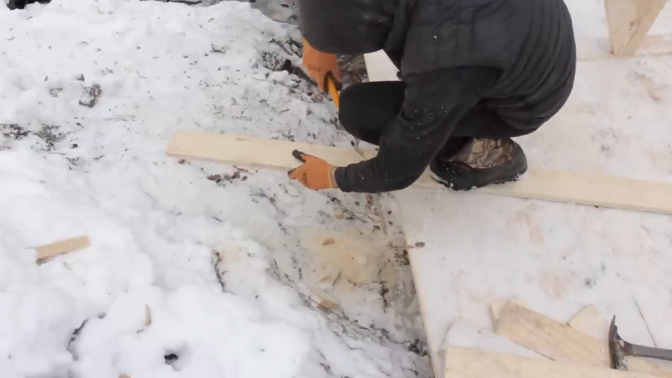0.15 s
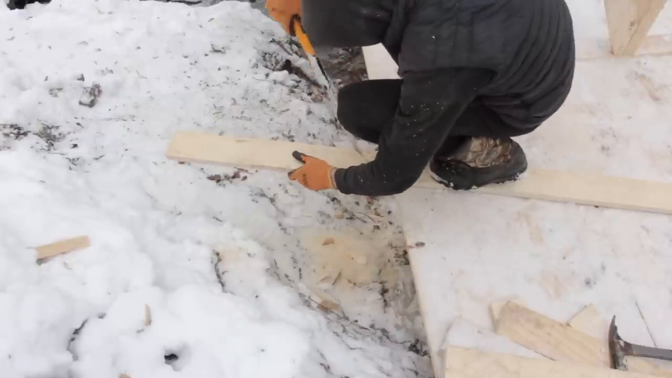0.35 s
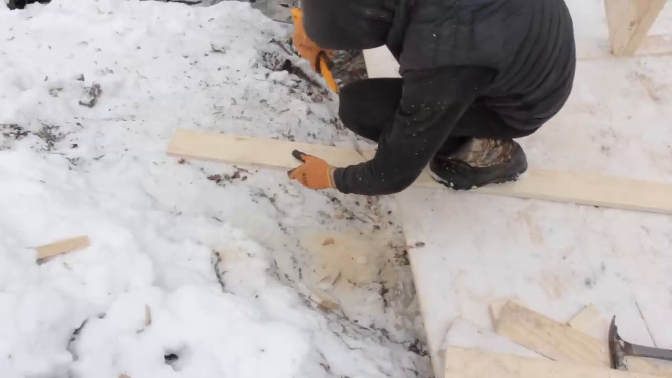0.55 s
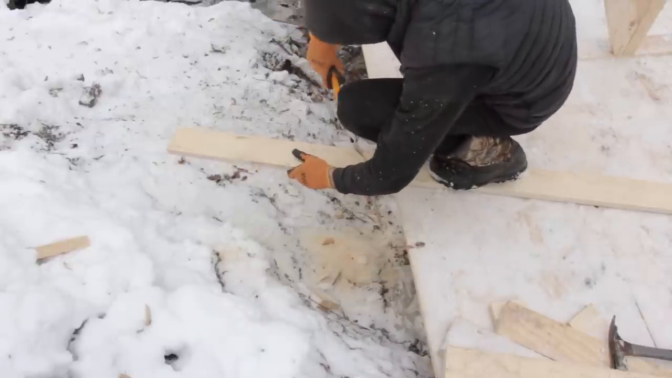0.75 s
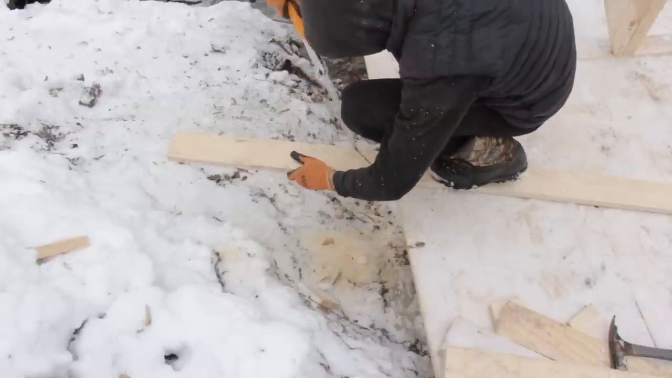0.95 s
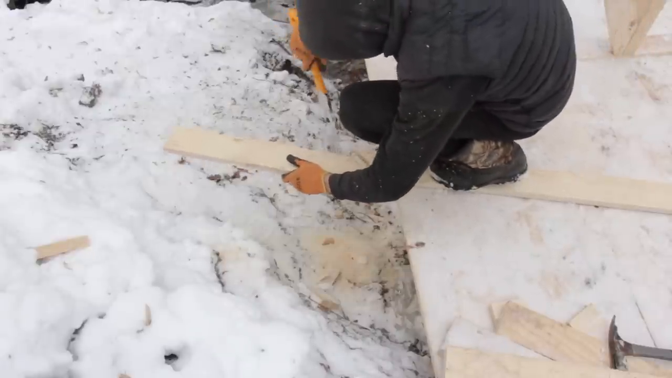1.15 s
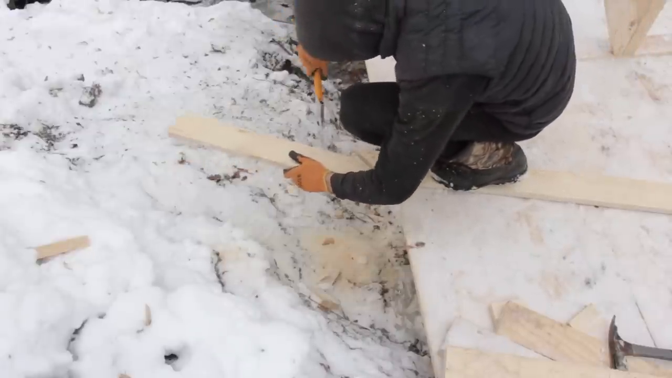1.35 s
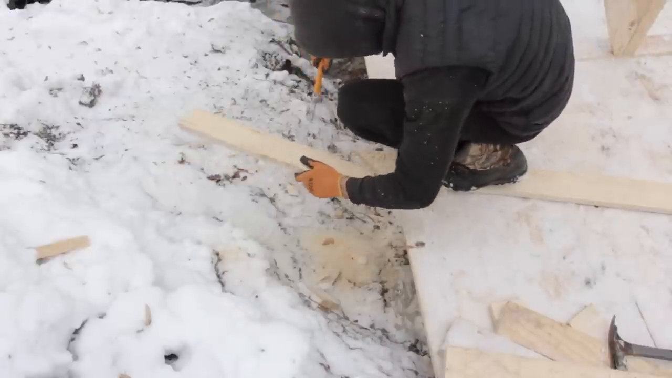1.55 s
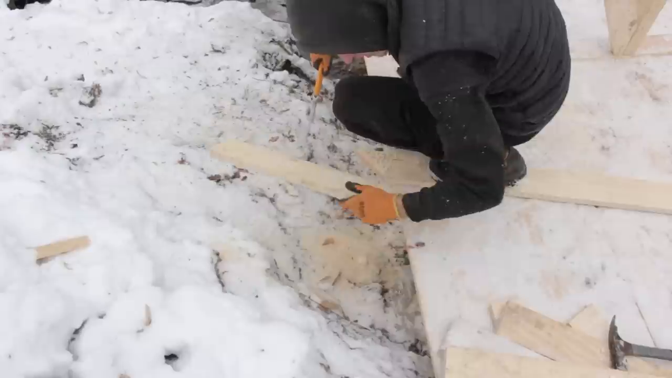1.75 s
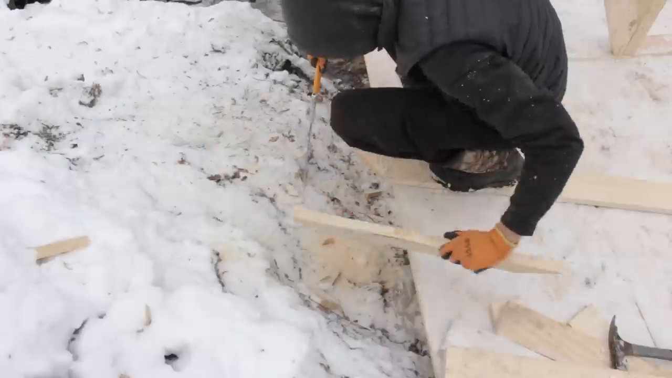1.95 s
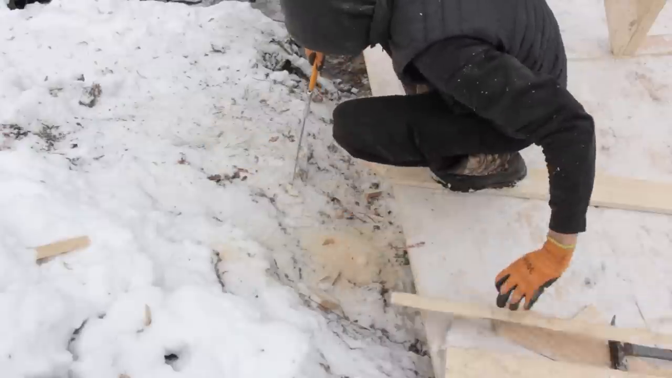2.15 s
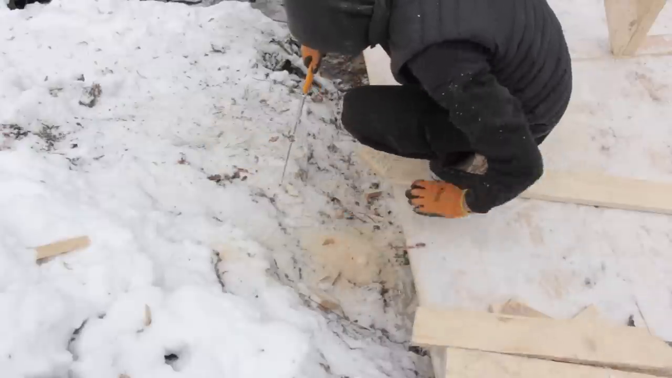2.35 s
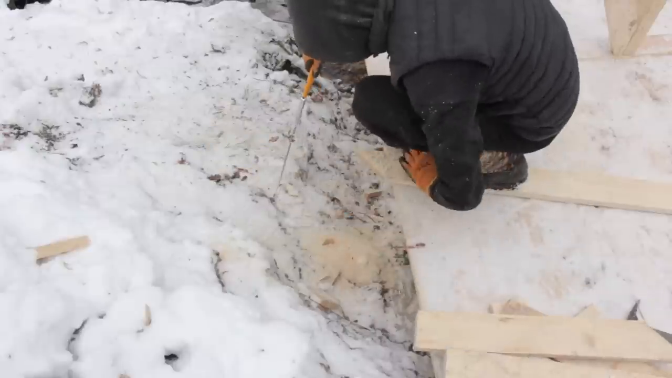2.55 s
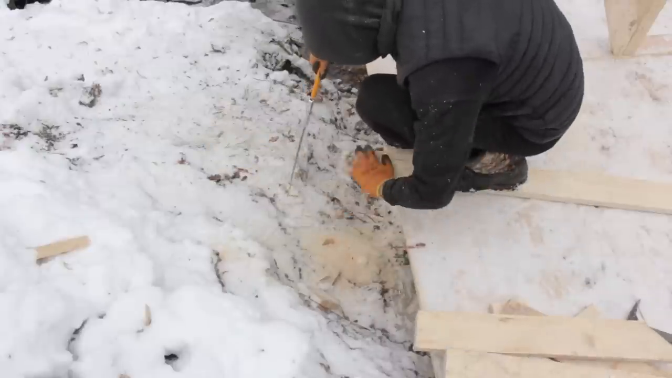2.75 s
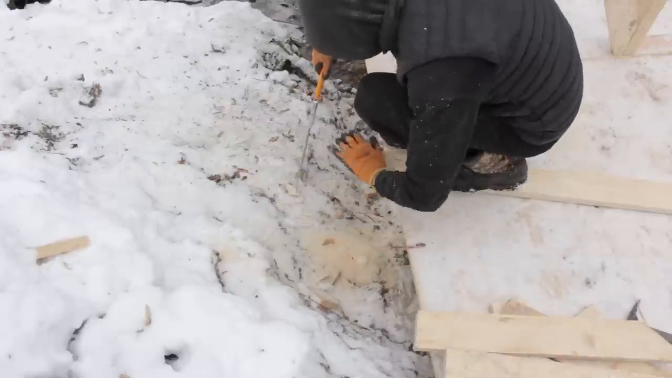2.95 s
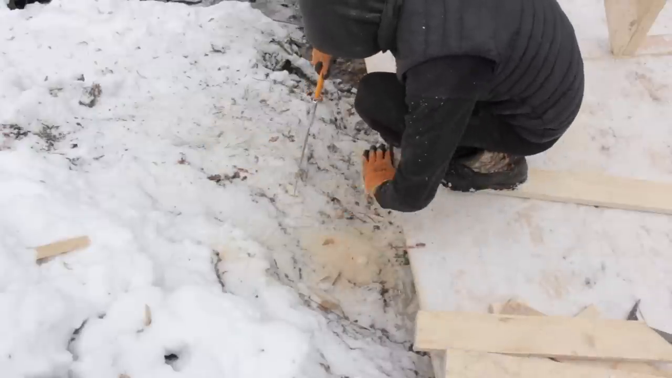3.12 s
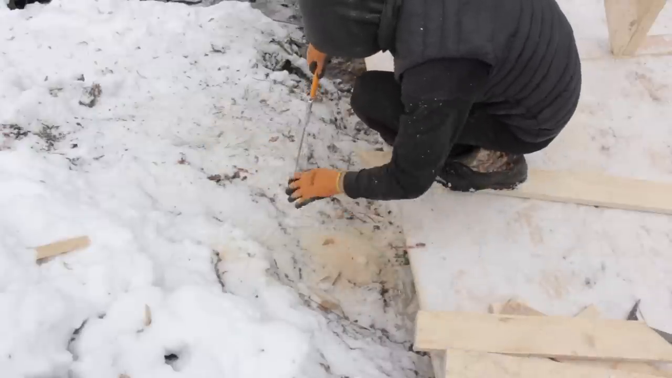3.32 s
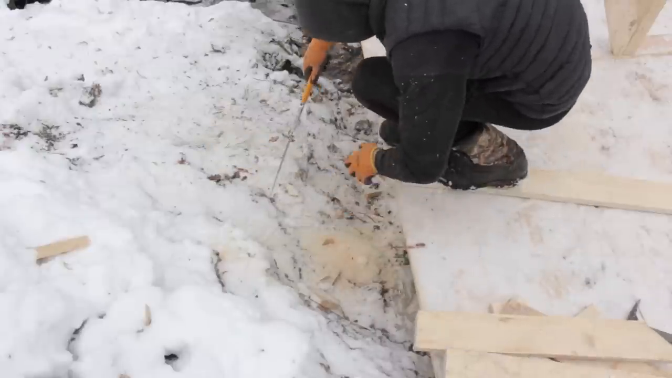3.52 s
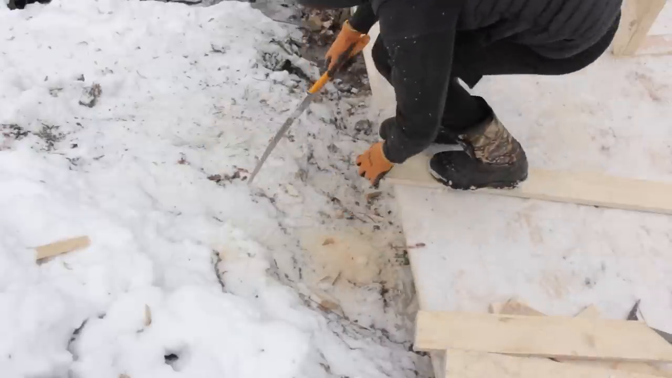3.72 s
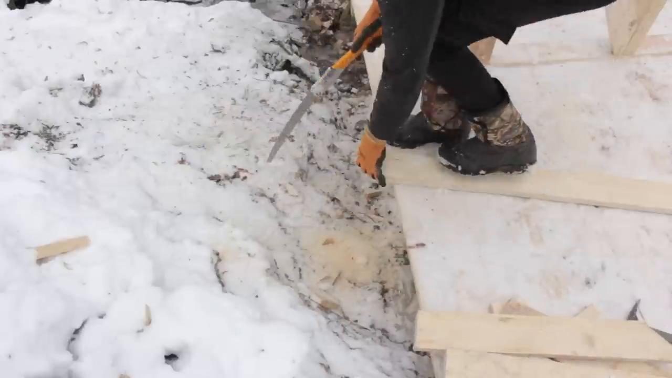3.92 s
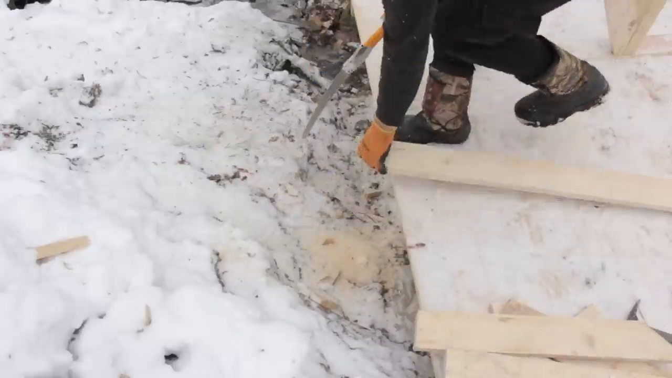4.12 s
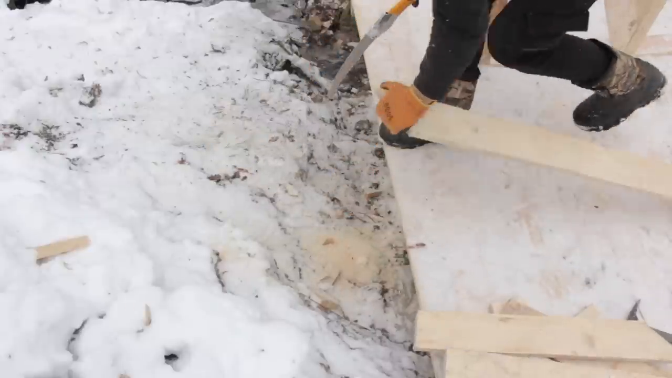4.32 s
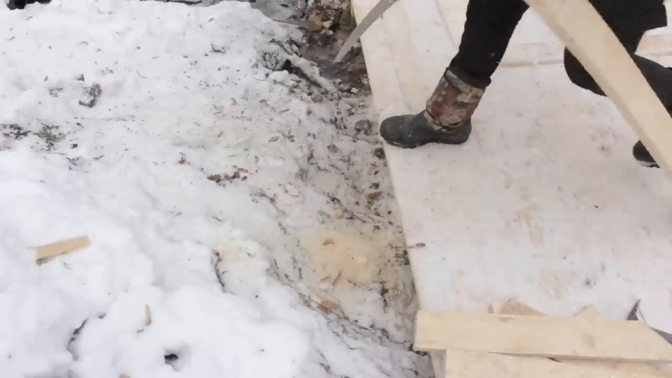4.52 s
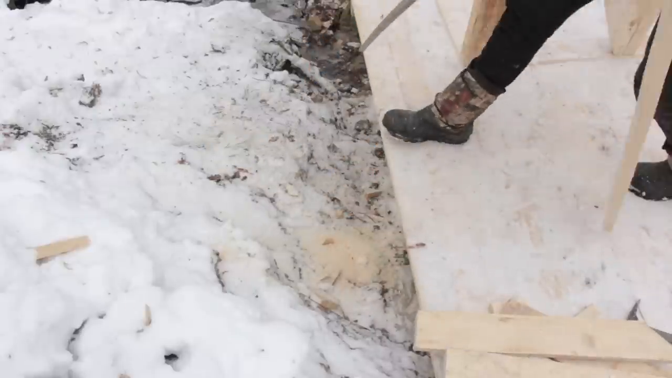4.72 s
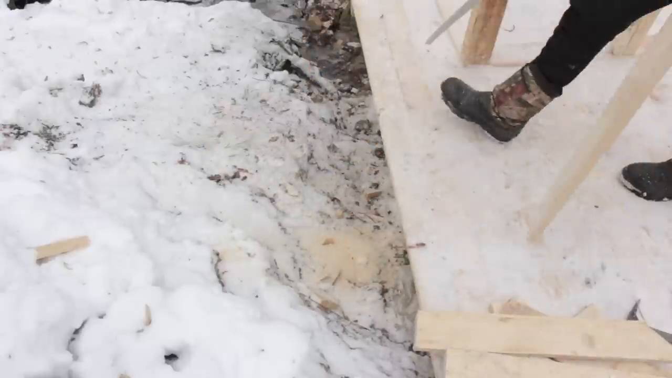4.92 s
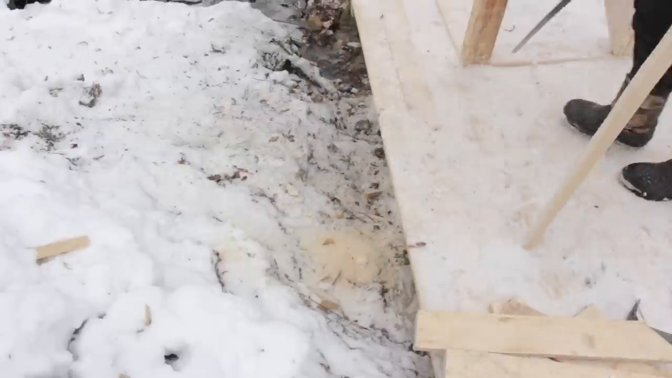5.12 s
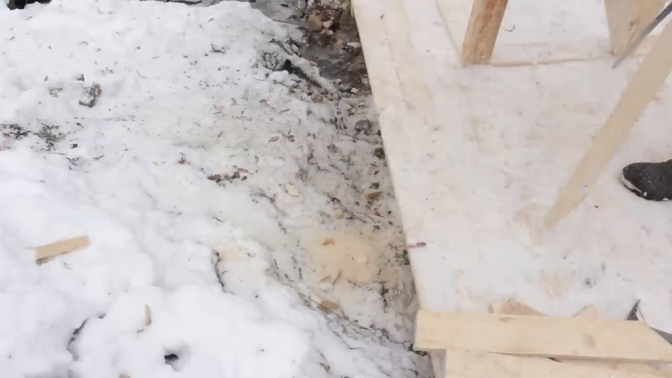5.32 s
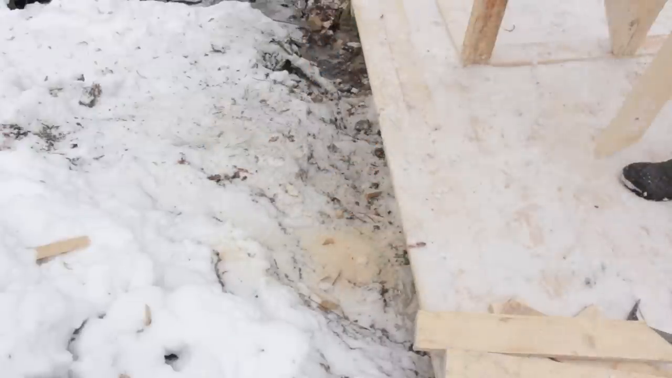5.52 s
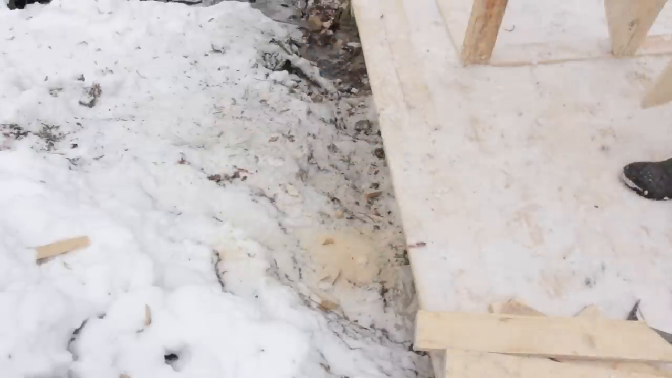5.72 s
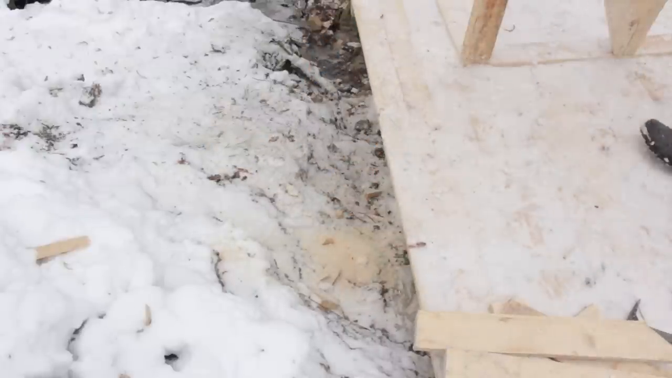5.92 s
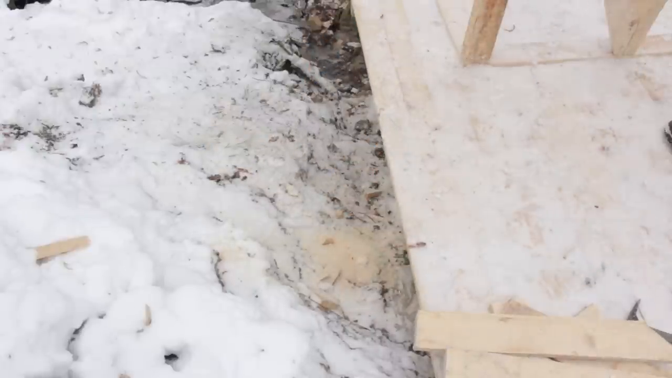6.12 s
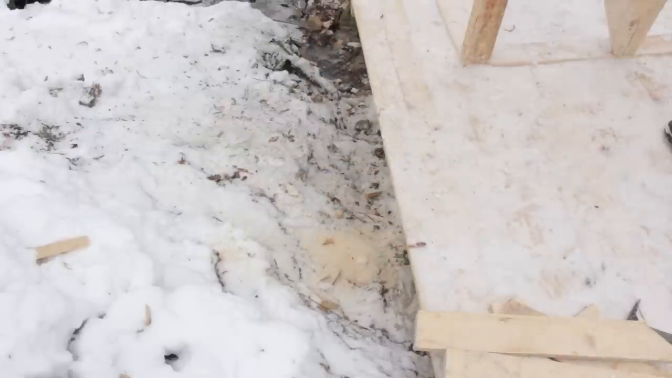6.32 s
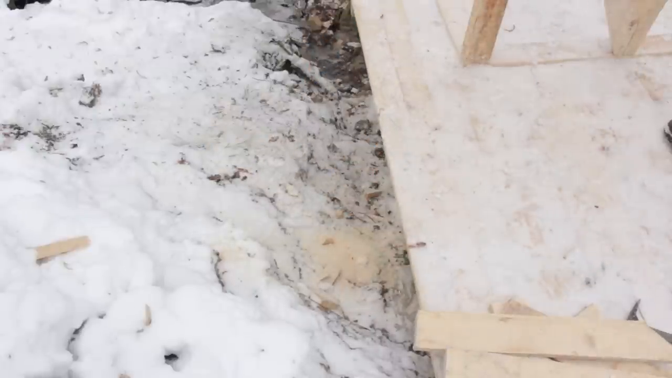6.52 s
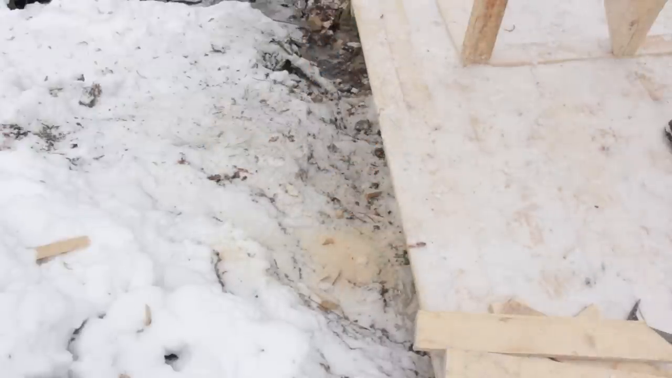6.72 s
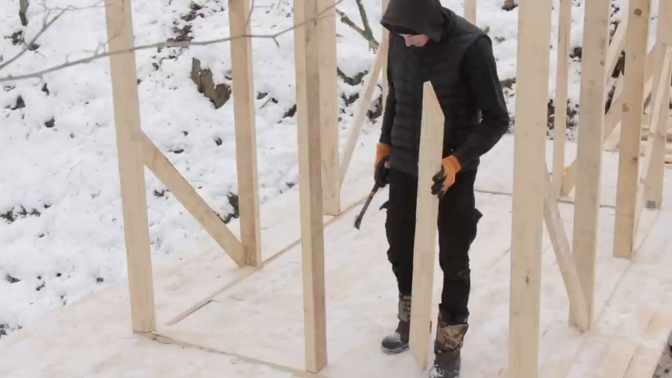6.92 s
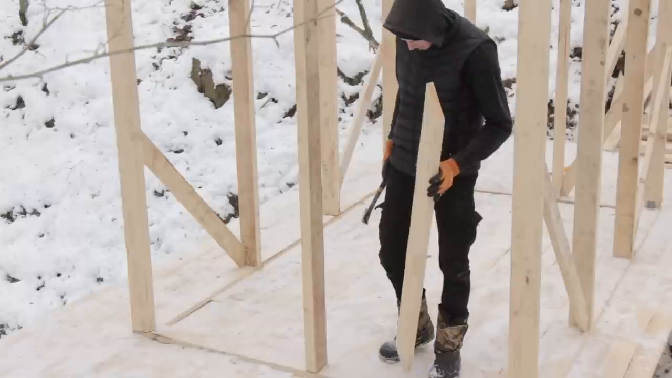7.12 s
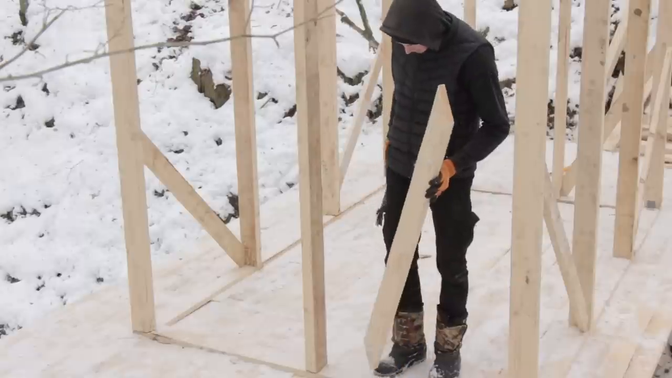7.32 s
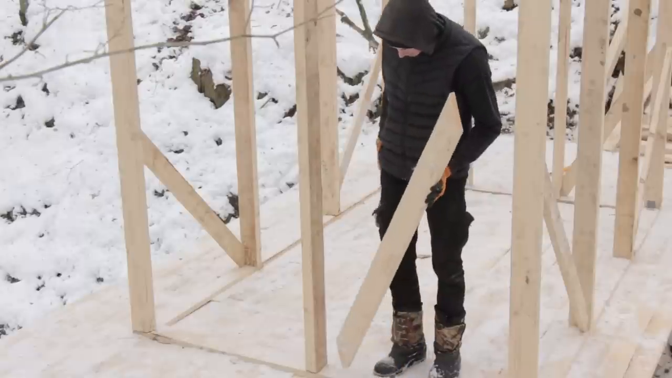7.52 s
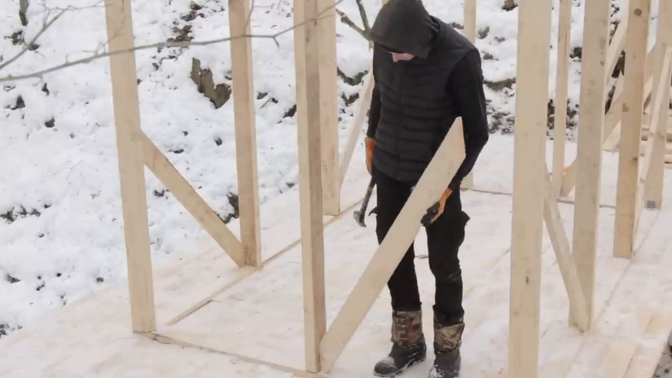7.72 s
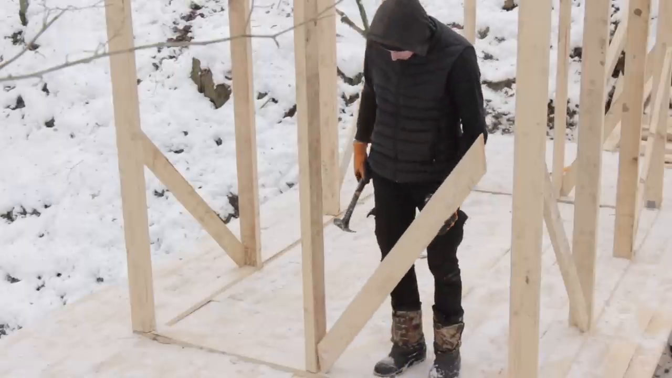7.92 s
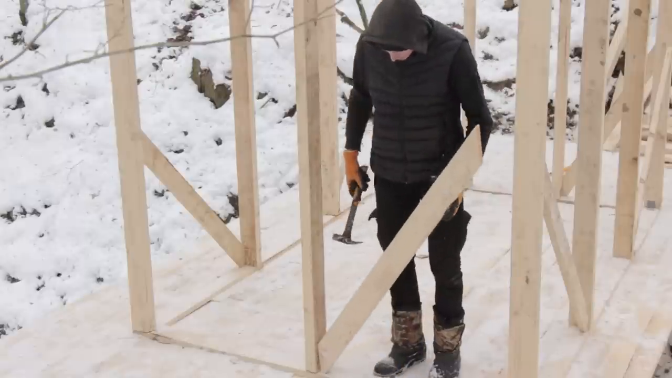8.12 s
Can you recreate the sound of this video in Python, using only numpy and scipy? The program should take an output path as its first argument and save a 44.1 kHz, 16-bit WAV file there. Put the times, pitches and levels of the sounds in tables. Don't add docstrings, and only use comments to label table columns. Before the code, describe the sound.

Last rasping handsaw strokes through a plank, offcut clattering onto wood, then boot thuds on a plywood deck beside a softly running stream.

```python
import sys
import numpy as np
from scipy import signal
from scipy.fft import rfft, irfft, next_fast_len
from scipy.io import wavfile
from scipy.ndimage import uniform_filter1d

SR = 44100
rng = np.random.default_rng(int(sys.argv[2]) if len(sys.argv) > 2 else 0)


def materialize(psi):
    bounded = np.clip(np.atleast_2d(psi).T, -1, 1)
    quanta = np.round(bounded * 32767).astype(np.int16)
    wavfile.write(sys.argv[1], SR, quanta)


def boost(x):
    u = np.asarray(x, float) / 20
    return 10 ** u


N = 364251
CHANGE_S = 6.893


def level(x, db=0):
    return x * boost(db) / np.sqrt(np.mean(x ** 2))


def colour(x, points):
    hz, db = np.transpose(points)
    size = next_fast_len(len(x))
    f = np.maximum(np.arange(size // 2 + 1) * SR / size, 1)
    gain = boost(np.interp(np.log(f), np.log(hz), db))
    return level(irfft(rfft(x, size) * gain, size)[:len(x)])


def ring(x, hz, width_hz):
    return signal.lfilter(*signal.iirpeak(hz, hz / width_hz, fs=SR), x)


def body(x, peaks):
    parts = [(-1) ** k * boost(db) * ring(x, hz, width) for k, (hz, width, db) in enumerate(peaks)]
    return level(sum(parts))


def walk(rate):
    k = int(SR / rate)
    steps = np.repeat(rng.standard_normal(N // k + 1), k)
    return 2.46 * uniform_filter1d(uniform_filter1d(steps, k), k)[:N]


def grit(per_s, spread_db):
    happens, sign, size = rng.random((N, 3)).T
    clicks = (happens < per_s / SR) * np.sign(sign - .5)
    return level(clicks * boost(-spread_db * np.log(1 - .97 * size)))


def split(x, hz):
    filters = [signal.butter(4, hz, kind, fs=SR, output="sos") for kind in ("low", "high")]
    return [level(signal.sosfilt(sos, x)) for sos in filters]


def swells(rows, power=1.4):
    t, out = np.arange(N) / SR, np.zeros((len(rows), N))
    for gain, (s, db, rise, fall, *_) in zip(out, rows):
        near = slice(max(int((s - 3 * rise) * SR), 0), max(int((s + 3 * fall) * SR), 0))
        away = np.where(t[near] < s, (s - t[near]) / rise, (t[near] - s) / fall)
        gain[near] = boost(db - 20 * away ** power)
    return out


def fade(t, t60):
    return np.exp(-np.log(1000) * t / max(t60, .01))


def add(out, s, sound):
    i = int(s * SR)
    if s < CHANGE_S:
        sound = sound[:int(CHANGE_S * SR) - i]
    out[i:i + len(sound)] += sound


def blow(db):
    return boost(db + 1.17 * max(db + 9, 0))


# deepest bite in seconds, bite in dB, rise in s, fall in s, plank note over bite in dB.
STROKES = [
    (-0.02, -43, 0.12, 0.094, -19),
    (0.09, -44, 0.065, 0.053, -4),
    (0.147, -29.5, 0.079, 0.071, 6.5),
    (0.392, -25, 0.1, 0.067, 0.5),
    (0.56, -47, 0.06, 0.063, -6),
    (0.632, -37, 0.13, 0.11, 1),
    (0.94, -25, 0.1, 0.084, -4.5),
    (1.11, -62, 0.082, 0.14, -15),
]
# start in seconds, extra bite in dB, singing blade note in Hz, its dB.
CATCHES = [(0.06, 6, 4160, -36), (0.124, 2, 5660, -41), (0.149, 0, 4160, -40), (0.33, -1, 5800, -33),
           (0.344, 0, 4070, -30), (0.357, -2, 7200, -37), (0.369, -1, 10000, -25), (0.381, 3, 10600, -33),
           (0.4, 3, 11700, -33), (0.412, 1, 1040, -24), (0.422, 1.5, 4150, -23), (0.428, 4, 10400, -30),
           (0.432, 3, 11800, -37), (0.617, 3, 4200, -28), (0.641, 1, 4500, -30), (0.668, 4, 4300, -28),
           (0.853, 1, 4260, -29), (0.874, 5, 4370, -26), (0.893, 6, 4170, -21), (0.904, 4.5, 1710, -22),
           (0.919, 4, 10300, -25), (0.935, 4, 4200, -17), (0.948, -8, 4300, -30), (0.955, 10.5, 10200, -27),
           (0.979, 10.5, 11800, -31), (1.005, 12.5, 4200, -27), (1.084, 7, 10300, -40),
           (1.095, 6, 10500, -41)]
# frequency in Hz, level in dB per Hz.
TEETH = [(120, -33), (200, 13.5), (305, -10), (499, -5.5), (1200, -14), (2280, -8), (3050, -15), (4170, -9),
         (4900, -33.5), (8300, -36), (11000, -32), (15800, -46)]
# frequency in Hz, width in Hz, level in dB.
BLADE = [(520, 430, 1), (840, 33, 8.5), (1033, 48, 12), (1660, 250, 8.5), (2330, 190, -5), (3295, 91, 5.5),
         (3350, 92, -45.5), (4220, 110, -6), (5280, 41, -18), (5800, 150, -9), (6350, 97, -47),
         (9320, 260, -21), (11400, 100, -31), (11800, 110, -20)]
# frequency in Hz, width in Hz, level in dB.
KERF = [(1035, 51, 4.5), (1077, 95, -3.5)]
# frequency in Hz, width in Hz, level in dB.
HUM = [(79.4, 17, 1.5), (100.4, 21.4, 0.5), (143, 7.5, -7), (240.3, 14, -8)]


def saw():
    t = np.arange(N) / SR
    strokes = swells(STROKES)
    bite = strokes.sum(0)
    note = boost(np.array(STROKES)[:, -1]) @ strokes
    surge_db = sum(db * np.exp(-((t - s) / np.where(t < s, 0.0017, 0.01)) ** 2) for s, db, *_ in CATCHES)
    tearing = grit(5000, 3.8) * boost(surge_db + 1.0 * walk(129.3))

    lag_s = 0.043
    keep = np.exp(-1 / (lag_s * SR))
    lagged = signal.lfilter([1 - keep], [1, -keep], bite, zi=[bite[0]])[0]
    shake = boost(-28.5) * lagged ** 0.18 * np.minimum(lagged / boost(-42.5), 1)

    voice = level(colour(tearing, TEETH), -2.3) + level(body(tearing, BLADE), -0.88)
    low, high = split(voice, 5900)
    _, low = split(low - ring(low, 1020, 250), 315)
    rasp = boost(-7) * bite.max() * (bite / bite.max()) ** 0.94
    return bite * low + rasp * high + note * body(tearing, KERF) + shake * body(tearing, HUM)


def sing():
    half_s, sing_s = 0.005, 0.014
    out, t = np.zeros(N + SR), np.arange(SR // 10) / SR
    for s, _, hz, db in CATCHES:
        scratch = rng.standard_normal(len(t)) * np.exp(-(t / half_s - 1) ** 2)
        tone = ring(scratch, hz, 3.2 / sing_s)
        add(out, s - half_s, boost(db) * tone / np.abs(tone).max())
    return out[:N]


# start in seconds, peak in dB,
# deck thump over peak in dB, hardness over peak in dB, ring in seconds.
OFFCUT = [(0.47, -17, -8, -18, 0.074), (0.944, -7.5, -9, -6.5, 0.087), (0.981, -8.5, -21, -14, 0.054),
          (1.005, -12.5, -9, -3, 0.029), (2.1756, -4, -10, -6, 0.066), (2.184, -2, -14, -32, 0.032),
          (2.198, -15, -9, -27, 0.039), (2.274, -5, -11, -8, 0.072), (2.318, -3.5, -16, -27, 0.058),
          (2.341, -4, -18, -8, 0.055), (2.371, -26.5, 4, -0.5, 0.16), (2.422, -12, -4.5, -23, 0.1),
          (2.443, -21.5, 5, -7, 0.1), (2.501, -19, -4.5, -30, 0.081), (2.541, -31, -11, 7.5, 0.073),
          (2.555, -10.5, -7, -26, 0.086)]
# start in seconds, peak in dB,
# deck thump over peak in dB, hardness over peak in dB, ring in seconds.
LANDINGS = [(3.18, -37, 8.5, 1, 0.046), (3.631, -48, 8, 6, 0.22), (4.542, -19.5, -8, -28, 0.063),
            (4.563, -33, -3, -14, 0.055), (4.705, -26, -9, 0, 0.062), (5.119, -7, -29, -10, 0.056),
            (5.128, -3.5, -14, -12, 0.067), (5.16, -8, -34, -16, 0.084), (5.178, -18, -11, -6, 0.047),
            (6.45, -17, -2, -7, 0.15), (6.459, -8, -27, -14.5, 0.11), (6.466, -7.5, -11, -6, 0.058),
            (6.509, -28.5, 2, -23, 0.25), (6.798, -37, 1, -7, 0.066), (7.509, -53, -11, -11, 0.09),
            (7.827, -27.5, -3, -7, 0.13), (7.862, -31, -1, -11, 0.11), (7.874, -27.5, -1, -11, 0.097),
            (7.92, -37, -1, -12, 0.11), (7.959, -47, 6, -2, 0.067)]
# start in seconds, peak in dB,
# bright clatter over peak in dB, crack over peak in dB.
TICKS = [(0.935, -32, -2, 0), (1.003, -26, -5, 15), (1.081, -37, 6, 13), (2.7, -36, -5, 6),
         (3.975, -37, -12, 23), (4.428, -36, 17, 0), (4.456, -26, 12.5, -14), (4.473, -38, 3, -5),
         (4.792, -33, -13, 8), (4.804, -21, -2.5, 6.5), (5.355, -40.5, 8, 11), (5.711, -42, 3, 9),
         (5.902, -37.5, 10, 10), (6.123, -40, 13.5, 19), (6.173, -42, 13.5, 13)]


def blows():
    heavy = [(s, db, thump, hard, -1.5 + 1.15 * hard, ring_s)
             for s, db, thump, hard, ring_s in OFFCUT + LANDINGS]
    light = [(s, db, -17, bright, crack, 0.067) for s, db, bright, crack in TICKS]
    return sorted(heavy + light)


# frequency in Hz, level in dB per Hz.
WOOD = [(150, -32), (250, -1.5), (600, 2.5), (1000, -1), (1900, 2), (2400, -9), (4200, -14), (6000, -21),
        (8300, -32), (10000, -29), (16000, -44)]
# frequency in Hz, level in dB, time to fade by 60 dB in seconds.
DECK = [(76.1, -8.5, 0.91), (83, -24, 0.2), (93.6, -9, 0.61), (111.5, 11, 0.13), (139, 9, 0.15),
        (171.7, 4, 0.17), (185, 14, 0.074), (203.8, 3.5, 0.16), (229.3, -6, 0.26)]


def knocks():
    out, t = np.zeros(N + SR), np.arange(SR * 3 // 4) / SR
    dull, rest = split(colour(grit(5500, 4.1), WOOD), 1076)
    bright, crack = split(rest, 3370)
    for s, db, thump_db, bright_db, crack_db, ring_s in blows():
        start = int(s * SR / 2)
        part = slice(start, start + len(t))
        wood = dull[part] * fade(t, ring_s)
        wood += boost(bright_db) * bright[part] * fade(t, 1.02 * ring_s)
        wood += boost(crack_db) * crack[part] * fade(t, 0.37 * ring_s) * (1 - np.exp(-t / 0.0012))
        wood *= 1 - np.exp(-t / 0.0015)
        thump = np.zeros(len(t))
        for hz, mode_db, t60 in DECK:
            louder, sharper = rng.standard_normal(2)
            tone = np.sin(2 * np.pi * hz * (1 + 0.0398 * sharper) * t)
            thump += boost(mode_db + 3.0 * louder) * tone * fade(t, t60)
        thump = thump * (1 - np.exp(-t / 0.0073)) / np.abs(thump).max()
        add(out, s, blow(db) * (boost(-3.5) * wood + boost(thump_db + 11.5) * thump))
    return out[:N]


# start in seconds, peak in dB, note
# in Hz, ring in seconds.
NOTES = [(0.945, -7.5, 1040, 0.06), (1.752, -34, 548, 0.13), (2.274, -4.5, 781, 0.12),
         (2.318, -6.5, 600, 0.085), (2.502, -17.5, 810, 0.036), (2.542, -17, 1260, 0.08),
         (2.558, -10, 601, 0.057), (3.522, -33.5, 672, 0.11), (4.805, -15, 1080, 0.03),
         (6.365, -31.5, 660, 0.095), (6.413, -30, 606, 0.073), (7.828, -27.5, 360, 0.2),
         (7.508, -48.5, 207, 0.19), (5.132, -12, 408, 0.082), (3.8, -45, 880, 0.15),
         (3.63, -39.5, 230, 0.12), (0.471, -26, 1170, 0.032), (0.952, -20, 432, 0.15),
         (0.968, -18, 524, 0.067), (0.982, -19, 600, 0.067), (1.002, -14, 1650, 0.038),
         (1.004, -15, 2210, 0.039), (1.006, -23, 425, 0.091), (2.176, -6, 263, 0.061),
         (2.184, -5, 625, 0.059), (2.205, -16.5, 530, 0.16), (2.276, -11.5, 350, 0.15),
         (2.278, -11, 620, 0.096), (2.343, -7.5, 1070, 0.045), (2.346, -14, 720, 0.054),
         (2.3, -16, 536, 0.058), (2.424, -24, 660, 0.1), (2.425, -21.5, 1250, 0.12),
         (2.424, -31, 2000, 0.065), (2.555, -12, 330, 0.077), (2.59, -31, 370, 0.12),
         (4.543, -13.5, 1160, 0.038), (4.559, -31, 290, 0.064), (5.14, -12, 560, 0.089),
         (5.161, -13, 710, 0.063), (5.168, -22, 380, 0.064), (6.452, -8, 378, 0.15),
         (6.467, -9, 1400, 0.07), (6.478, -14, 380, 0.1), (6.475, -16, 950, 0.083),
         (7.914, -38, 1300, 0.03), (7.87, -31, 450, 0.093), (4.925, -38, 350, 0.06), (4.97, -36, 370, 0.06),
         (4.704, -23, 450, 0.049), (0.13, -25.5, 245, 0.23), (0.41, -26.5, 257, 0.5),
         (0.545, -35, 230, 0.24), (0.68, -32, 255, 0.4), (0.63, -34, 603, 0.21)]


def board_notes():
    out, t = np.zeros(N + SR), np.arange(SR * 3 // 4) / SR
    for s, db, hz, ring_s in NOTES:
        rough = ring(rng.standard_normal(len(t)) * fade(t, 0.54 * ring_s), hz, 4.0 / max(ring_s, .01))
        tone = np.sin(2 * np.pi * hz * t) * fade(t, 0.81 * ring_s)
        note = boost(-5.5) * rough / np.abs(rough).max() + tone
        note = note * (1 - np.exp(-t * hz / 0.6))
        add(out, s, blow(db) * note / np.abs(note).max())
    return out[:N]


# start in seconds, peak in
# dB, note in Hz, time to fade by 60 dB in seconds.
BOOMS = [(2.1765, -7, 146, 0.2), (2.555, -22, 102, 0.37), (2.556, -14.5, 270, 0.15), (2.801, -44, 66, 0.6),
         (3.178, -33.5, 136, 0.31), (3.22, -34.5, 75, 0.42), (4.703, -20, 194, 0.081),
         (5.1205, -0.5, 136.5, 0.081), (5.176, -15, 77, 0.5), (5.325, -29, 74, 0.4), (5.46, -36, 75, 0.6),
         (5.67, -40, 120, 0.15), (4.45, -32, 130, 0.25), (4.558, -30, 190, 0.15), (4.97, -38, 130, 0.1),
         (4.995, -43, 71, 0.48), (4.6, -50, 69, 0.89), (6.4485, 3, 152, 0.072), (6.5, -25, 76, 0.77),
         (6.794, -28, 111, 0.15), (7.828, -21, 187, 0.059), (7.9, -39, 80, 0.84), (7.84, -39.5, 51, 1.3),
         (7.95, -41.5, 96, 0.98), (6.52, -36, 48, 1.2), (2.849, -38.5, 79, 0.69), (5.128, -6, 198, 0.13),
         (4.06, -48, 77, 0.33), (2.79, -33, 129.6, 0.19), (0.0035, -23, 82.6, 0.2),
         (0.06, -27.5, 121, 0.32), (0.44, -20.5, 105, 0.2), (0.53, -23.5, 106, 0.33),
         (0.735, -28.5, 80, 0.44)]


def booms():
    out, t = np.zeros(N + SR), np.arange(SR * 3 // 4) / SR
    joists = level(ring(ring(rng.standard_normal(N), 70, 71), 70, 71))
    for s, db, hz, t60 in BOOMS:
        rumble = boost(-17) * joists[int(s * SR / 2):][:len(t)] * fade(t, 1.23 * t60)
        hum = np.sin(2 * np.pi * hz * t) * fade(t, t60)
        add(out, s, boost(db) * (hum + rumble) * (1 - np.exp(-t * hz / 0.41)))
    return out[:N]


# loudest moment in seconds, level in dB, rise in s, fall in s.
SLIDES = [(4.413, -32, 0.1, 0.05), (4.432, -26, 0.014, 0.027), (4.447, -23.5, 0.012, 0.016),
          (4.459, -17.5, 0.0096, 0.014), (4.475, -17.5, 0.0076, 0.012), (4.482, -18, 0.01, 0.015),
          (4.49, -18.5, 0.0066, 0.012), (4.501, -19.5, 0.011, 0.012), (4.519, -24, 0.025, 0.034),
          (4.545, -19, 0.011, 0.0057)]
# frequency in Hz, width in Hz, level in dB.
PLANK = [(620, 32, -16), (822, 13.8, 0.5), (1133.6, 32, 3), (1485, 49, 9), (1806, 73, 1), (2300, 21, 0.5),
         (2635, 94, -4), (2750, 36, -20), (3360, 54, -28), (4360, 100, -18)]


def drag():
    slips = grit(9000, 3.0) * boost(1.6 * walk(140))
    rasp = level(ring(ring(slips, 1200, 1750), 1150, 1800), -8)
    notes = level(body(slips, PLANK), -1.9)
    hum = level(body(slips, HUM), -20.5)
    return sum(swells(SLIDES)) * (notes + rasp + hum)


# loudest moment
# in seconds, level in dB, rise in s, fall in s, treble over level in dB.
SCUFFS = [(1.006, -26, 0.0064, 0.0063, 3.5), (1.084, -45, 0.005, 0.012, 1), (1.096, -46, 0.008, 0.02, 3),
          (2.53, -41, 0.037, 0.04, -2), (2.61, -39, 0.037, 0.037, -7), (2.69, -45, 0.063, 0.094, -8),
          (2.775, -39.5, 0.046, 0.068, -2), (2.845, -34.5, 0.076, 0.04, -3), (3.236, -34, 0.11, 0.054, -5),
          (3.83, -46, 0.12, 0.021, -6), (3.98, -45, 0.1, 0.015, -3), (4.49, -40, 0.027, 0.055, -2.5),
          (4.711, -33.5, 0.0088, 0.025, 0), (4.731, -32.5, 0.018, 0.019, -5.5),
          (4.89, -41, 0.087, 0.12, -12), (4.96, -40, 0.027, 0.043, -2), (5.01, -43.5, 0.055, 0.036, 0),
          (5.49, -50, 0.16, 0.095, -2), (5.7, -47, 0.065, 0.13, -6), (5.86, -46.5, 0.11, 0.11, -0.5),
          (6.127, -35.5, 0.029, 0.02, -3.5), (7.16, -55.5, 0.065, 0.059, -17), (7.35, -50, 0.04, 0.05, -1),
          (7.385, -47.5, 0.046, 0.047, -3.5), (7.425, -48, 0.042, 0.035, -5), (7.66, -60, 0.02, 0.026, -1)]
# frequency in Hz, level in dB per Hz.
SOLE = [(120, -5.5), (386, -2.5), (657, 0), (1060, 0.5), (1690, 1.5), (2080, -7), (4200, -10), (5900, -13),
        (8400, -21), (10100, -18), (15800, -30)]


def scuffs():
    rub = grit(18000, 4.4) * boost(0.7 * walk(150))
    low, high = split(colour(rub, SOLE), 2360)
    gains = swells(SCUFFS, power=2.2)
    treble = boost(np.array(SCUFFS)[:, -1])
    middle = np.sqrt(np.clip(1 - treble ** 2, .02, 1))
    shake = boost(-33) * gains.sum(0) * body(rub, HUM)
    return middle @ gains * low + treble @ gains * high + shake


# start in seconds, peak in dB,
# frequency in Hz.
SPECKS = [(2.372, -29, 10000), (2.374, -28, 5000), (2.385, -36, 9000), (2.345, -25, 4000),
          (2.202, -27, 4000), (6.497, -39, 9500), (4.96, -31, 6500), (5.007, -38, 5500), (2.543, -26, 5950),
          (2.543, -35, 10000), (2.542, -26, 4200), (2.88, -34, 6000), (4.567, -32, 5500),
          (4.567, -40, 10000), (4.779, -42, 12000), (4.845, -44, 11000), (4.857, -34, 4500),
          (4.89, -33, 5000), (4.89, -42, 11000), (4.92, -30, 4200), (5.028, -42, 12000), (5.944, -42, 7000),
          (6.176, -38, 3000), (7.335, -45, 9000), (7.517, -50, 7000), (7.655, -49, 6500), (7.78, -46, 6000),
          (8.062, -54, 9500), (1.082, -32, 4000), (1.082, -34, 11000), (1.095, -38, 11000),
          (0.874, -22, 4200), (0.892, -21, 7000), (0.935, -22, 11000), (0.953, -23, 11500),
          (1.008, -22, 9700), (0.06, -34, 6000)]


def specks():
    out, t = np.zeros(N + SR), np.arange(SR // 20) / SR
    for s, db, hz in SPECKS:
        width_hz = hz / 2.6
        snap = rng.standard_normal(len(t)) * fade(t, 0.018)
        snap = ring(ring(snap, hz, width_hz), hz, width_hz)
        add(out, s, boost(db) * snap / np.abs(snap).max())
    return out[:N]


# level in dB, frequency in Hz, width in Hz.
SLEEVE = (-35, 3300, 1700)


def swish():
    db, hz, width_hz = SLEEVE
    top_s, half_s = 6.049, .014
    band = ring(ring(grit(9000, 3), hz, width_hz), hz, width_hz)
    return level(band, db) * np.exp(-((np.arange(N) / SR - top_s) / half_s) ** 4)


# frequency in Hz, level in dB per Hz.
STREAM = [(15, -53), (25, -25), (145, -9.5), (194, -7), (241, -16.5), (528, -2.5), (770, -2.5), (956, -1.5),
          (1900, -0.5), (2250, -10), (4220, -6), (5990, -10), (8070, -24), (9480, -20), (15800, -33)]
# frequency in Hz, level in dB per Hz.
FAR_STREAM = [(15, -50), (25, -16), (102, -15), (194, -3.5), (248, -7.5), (316, -0.5), (362, -5.5),
              (449, -1.5), (1070, -1.5), (1900, -1), (2300, -6), (4200, -7), (6000, -10), (8070, -21.5),
              (9500, -20), (15800, -28)]


def stream():
    swell, rest = 0.3 * walk(3.128), rng.standard_normal(N)
    patchy = 0
    for hz in (300, 800, 2200, 5000, 8000):
        band = signal.sosfiltfilt(signal.butter(2, hz, fs=SR, output="sos"), rest)
        rest = rest - band
        patchy = patchy + band * boost(1.14 * swell + 0.8 * walk(14))
    patchy = patchy + rest * boost(0.5 * walk(16))
    far = np.arange(N) > CHANGE_S * SR
    water = np.where(far, colour(patchy, FAR_STREAM), colour(patchy, STREAM))

    t, bubbles = np.arange(SR // 20) / SR, np.zeros(N + SR)
    for at, pitch, size in rng.random((int(60 * N / SR), 3)):
        cycles = 450 * 5.0 ** pitch * t * (1 + 5.0 * t)
        bubble = np.sin(2 * np.pi * cycles) * np.exp(-cycles / 6.5)
        add(bubbles, at * N / SR, boost(-3.0 * np.log(1 - .95 * size)) * bubble)
    return boost(-40 - 11 * far) * (water + level(bubbles[:N], -10.5))


def scene():
    close = saw() + sing() + knocks() + board_notes() + booms() + drag() + scuffs() + specks() + swish()
    t = np.arange(SR // 5) / SR
    echoes = rng.standard_normal(len(t)) * fade(t, 0.11) * (t > .006)
    echoes = ring(echoes, 490, 1530)
    wet = signal.fftconvolve(close, echoes / np.sqrt(np.sum(echoes ** 2)))[:N]
    return (close + boost(-20.0) * wet + stream())[None]


def band_limit(x):
    return signal.sosfilt(signal.butter(12, 15830, fs=SR, output="sos"), x)


def record(dry):
    flat = dry / (1 + np.abs(dry / .32) ** 8) ** (1 / 8)
    soft = signal.lfilter(*signal.butter(2, 14500, fs=SR), flat)
    mix = signal.sosfilt(signal.ellip(8, .2, 60, 15800, fs=SR, output="sos"), soft)
    return band_limit(mix)


dry = scene()
out = record(dry)
materialize(out)
```